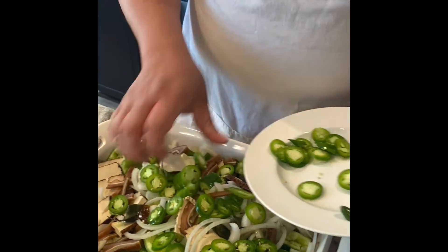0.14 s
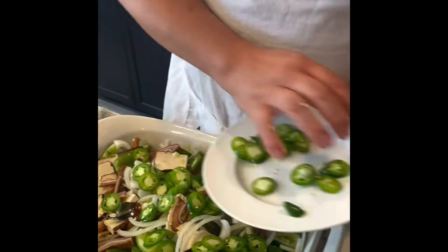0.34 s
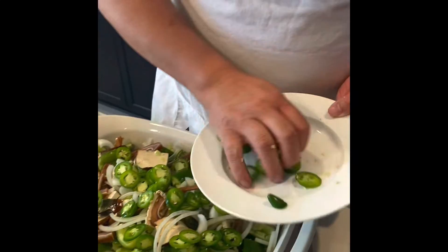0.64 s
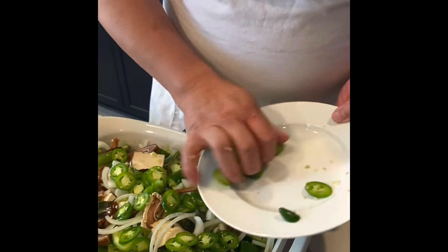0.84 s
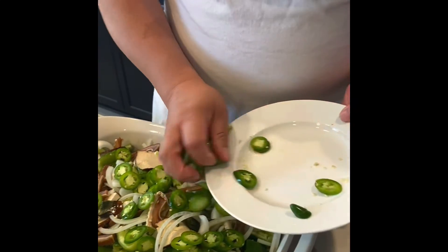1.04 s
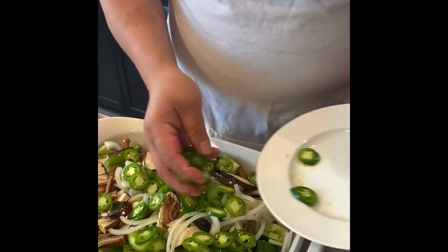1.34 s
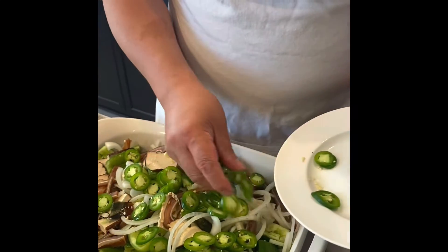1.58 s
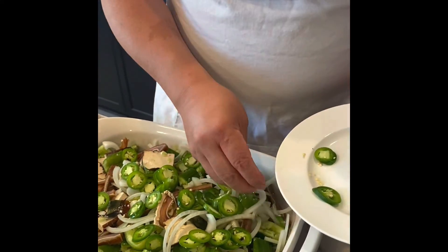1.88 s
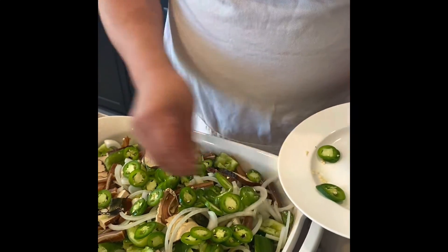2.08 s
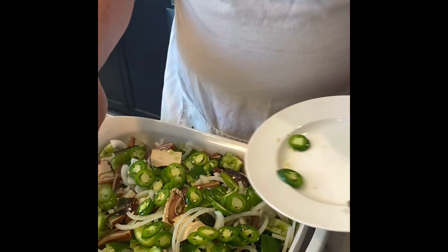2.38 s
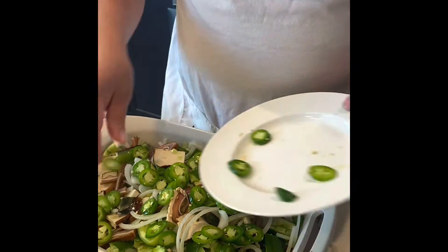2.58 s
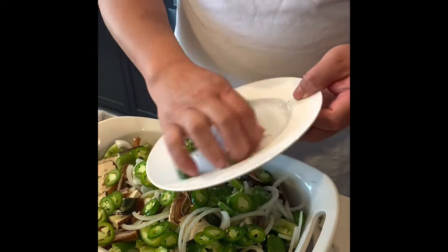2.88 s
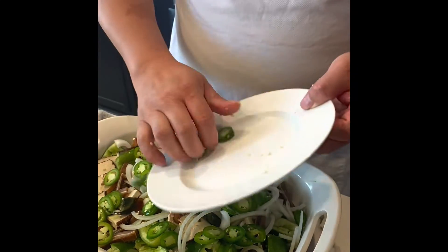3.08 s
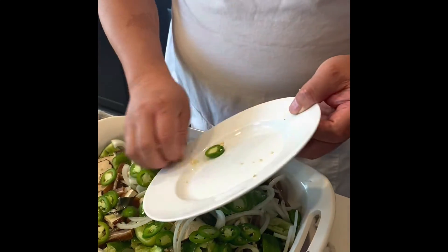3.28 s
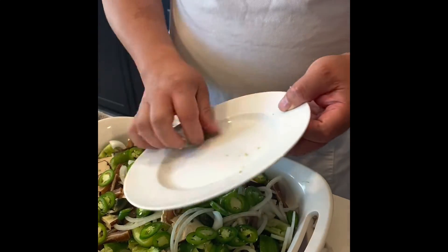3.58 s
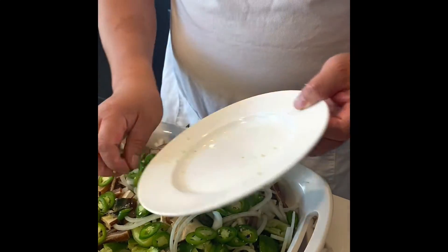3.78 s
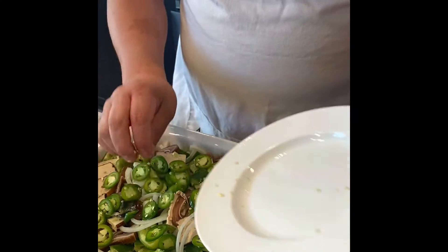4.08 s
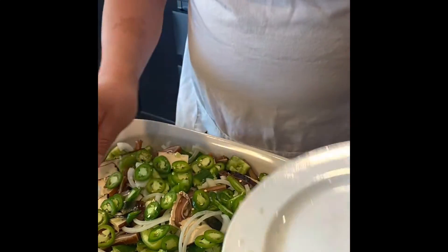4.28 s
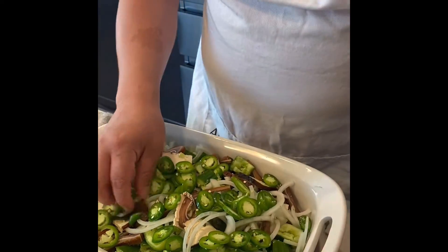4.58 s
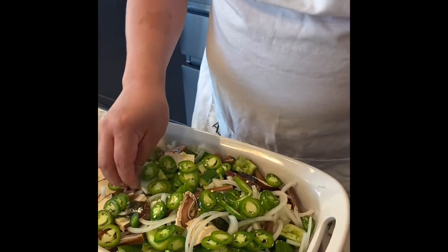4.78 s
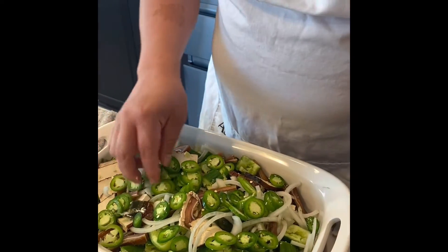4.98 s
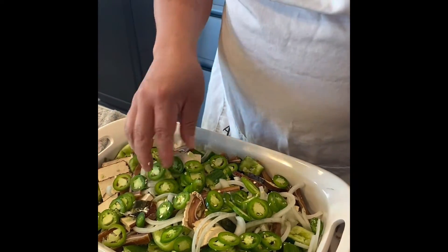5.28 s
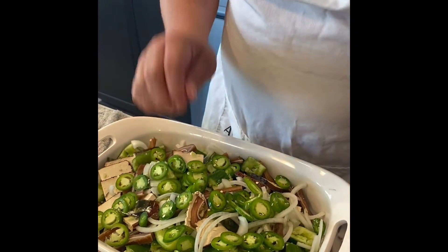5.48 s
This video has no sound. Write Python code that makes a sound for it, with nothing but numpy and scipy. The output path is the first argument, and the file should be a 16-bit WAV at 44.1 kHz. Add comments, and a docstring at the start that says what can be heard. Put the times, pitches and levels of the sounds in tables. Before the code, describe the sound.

A quiet home kitchen, heard very close in stereo, with a soft low appliance rumble throughout. A hand moves over a china plate and a dish of sliced vegetables, giving a continuous faint rustle of skin, sleeve and moist food that swells and fades. From about 0.35 to 1.2 s, small irregular nail ticks touch the plate, clearest near 0.45, 0.65 and 0.95 s, each a short bright ceramic ping damped by the grip. Mostly rustle and faint gliding swishes follow, with a weak tick at 1.85 s. More light ticks cluster at 2.85-3.25 s and 3.6-3.8 s, with brighter brushing. Then only soft rustling until 4.93 s, when the plate is put down: one hard, loud china knock with a dull support and slight low boom. After a brief lull, it rocks from 5.37 to 5.52 s in a rapid uneven clatter, leaving a short, faint room tail.

```python
"""A china plate, held over a dish close to the microphone: nails tick on its glaze as a hand gathers sliced peppers.
Each touch rings the plate's modes under the damping grip. Then the plate is set down on other china: a knock
and a rocking rattle ring the plate, a dull support and a low boom. Skin and food rustle as shaped noise with
faint gliding swishes. Behind the near china lie a short diffuse kitchen tail and a quiet rumble."""
import sys
import numpy as np
from scipy import signal
from scipy.fft import rfft, irfft
from scipy.io import wavfile
from scipy.ndimage import uniform_filter1d

SR = 44100
rng = np.random.default_rng(int(sys.argv[2]) if len(sys.argv) > 2 else 0)


def bounce(signal):
    """Save signal as a 16-bit WAV file at the path given by the first command-line argument."""
    frames = np.transpose(np.atleast_2d(signal))
    limited = np.clip(frames, -1, 1)
    pcm = np.round(limited * 32767).astype(np.int16)
    wavfile.write(sys.argv[1], SR, pcm)


N = 248724   # length in samples
HZ = np.maximum(np.fft.rfftfreq(N, 1 / SR), 1)   # FFT bin frequencies, kept above zero for the logarithms

# the plate's modes: f/Hz, level/dB when tapped on the face, level/dB when struck on the foot
PLATE_MODES = [(1752, -13.5, -15), (1844, -16.5, -10), (1870, -51, -13.5), (2034, -52.5, -7.5),
               (2437, -12, -2), (2510, -10.5, -14.5), (2723, -9, -3), (3170, -37.5, -42),
               (3080, -44, -12.5), (3695, -11.5, -16), (3740, -10.5, 0.5), (3830, -12, -3.5),
               (4284, -9.5, -14.5), (4390, -13, -4), (4700, -11, -14.5), (5450, -12.5, -8), (5590, -5, -7),
               (5750, -5, -3), (6210, -26, -16), (6715, -7, -5.5), (7090, -13, -34), (7500, -16.5, -21),
               (8230, -8, -4), (10380, -18, -27), (10700, -35, -19), (11040, -42, -18), (12030, -47, -18),
               (12720, -54, -22), (12970, -23, -28), (14900, -34, -33), (15330, -45, -39),
               (15690, -44, -21.5)]


def ticks():
    """Nails and slices ring the plate, damped by the holding hand; each touch adds a short snap and a dull pat."""
    # touches on the held plate: t/s, level/dB, two f/Hz the touched spot rings best at,
    # t60/s at 3 kHz under the grip, snap level/dB relative to the touch
    touches = [(.3426, -59.5, 3780, 6750, 0.1, -18), (.441, -39, 2660, 3630, 0.053, 5),
               (0.464, -47, 2734, 5735, 0.017, -25), (0.532, -45, 3740, 3830, 0.04, 10),
               (0.546, -56, 3740, 5735, 0.032, -7), (0.6529, -38.5, 2650, 3695, 0.061, 14.5),
               (0.7554, -62, 3700, 1750, 0.11, -21), (0.952, -66, 5735, 3870, 0.022, 17),
               (0.9601, -43, 2510, 3695, 0.022, 2), (1.098, -59, 4700, 8280, 0.1, -10),
               (1.17, -56.5, 1860, 1860, 0.14, -30), (1.62, -84, 6715, 8230, 0.023, 7),
               (1.849, -52, 1749, 4000, 0.014, -15), (2.842, -51, 3840, 1600, 0.11, 11),
               (2.874, -53.5, 5470, 3780, 0.072, -10), (3.149, -50, 4390, 3695, 0.069, -2),
               (3.165, -51.5, 1752, 6715, 0.054, -5), (3.198, -55, 5735, 4340, 0.039, -7),
               (3.233, -44.5, 2735, 1752, 0.06, -6), (3.578, -52, 5745, 1752, 0.047, 10),
               (3.591, -43, 2450, 3830, 0.033, -18), (3.646, -53.5, 3820, 4500, 0.046, -10),
               (3.683, -55, 6720, 4360, 0.064, 17), (3.719, -59, 6720, 4730, 0.12, -4),
               (3.756, -56.5, 1730, 4600, 0.069, -10), (3.78, -59, 3740, 4510, 0.12, -13),
               (4.871, -55, 1749, 4200, 0.016, -7)]
    face = np.array(PLATE_MODES)[:, [0, 1]]
    plate = np.zeros(N)
    for s, db, one_hz, other_hz, t60, _ in touches:
        add(plate, s, strike(face, db, [one_hz, other_hz], focus_db=3, hard_db=0, t60=t60))
    s, db, *_, snap_db = np.transpose(touches)
    snap = ring(clicks(s, db + snap_db), hz=5900, t60=0.0029)
    pat = ring(clicks(s, db + 1.5), hz=836, t60=0.0095)
    return plate + snap + pat


def knocks():
    """The plate rings while its support answers with a short knock; a harder contact makes both brighter."""
    # plate on china: t/s, knock level/dB, hardness/(dB per octave), plate ring level/dB,
    # two f/Hz the ring is strongest at
    contacts = [(4.9286, -27, 4, -48.5, 3740, 2730), (4.937, -3, 6, -28, 3740, 5450),
                (4.946, -47, -5, -26.5, 3750, 4400), (4.962, -13, -25, -51, 3670, 1730),
                (5.285, -41, -16.5, -84.5, 2750, 1750), (5.306, -32, -15, -98, 2760, 1730),
                (5.366, -34, -17, -73, 1750, 4360), (5.371, -25.5, -12, -57.5, 4390, 1730),
                (5.3751, -15.5, -11, -44, 4390, 5470), (5.382, -26, -16, -64, 4390, 1750),
                (5.407, -30, -3, -49, 4390, 2730), (5.413, -7.5, 0, -37, 3830, 4390),
                (5.419, -18, -1.5, -33.5, 2730, 3830), (5.454, -6, 1.5, -33, 2730, 3830),
                (5.464, -4.5, -6, -35, 2730, 5470), (5.477, -3, -7, -20.5, 2820, 5500),
                (5.484, -14.5, 3, -34, 2730, 1752), (5.493, -18, -15.5, -22.5, 3740, 5570),
                (5.503, -8, -9, -22.5, 3740, 1752), (5.511, -11.5, 1.5, -36, 2730, 3830),
                (5.518, -25, -9, -44.5, 2730, 5450)]
    # the support under the plate, short and dull: f/Hz, level/dB, t60/s
    support_modes = [(948, -9.5, 0.053), (1021, -5.5, 0.015), (1046, -0.5, 0.017), (1197, -5, 0.016),
                     (1460, -6, 0.0098), (1880, -15.5, 0.023), (2300, -6.5, 0.0029), (3010, -8, 0.0017)]
    # low boom of the counter: f/Hz, level/dB, t60/s
    boom_modes = [(118.8, -39, 0.42), (251, -31.5, 0.11), (362, -27.5, 0.027), (542, -19, 0.026)]
    foot = np.array(PLATE_MODES)[:, [0, 2]]
    plate = np.zeros(N)
    for s, _, hard_db, db, *hz in contacts:
        add(plate, s, strike(foot, db, hz, focus_db=3, hard_db=hard_db, t60=0.042))
    s, knock_db, hard_db = np.transpose(contacts)[:3]
    knock = np.zeros(N)
    for k, (hz, db, t60) in enumerate(support_modes):
        level_db = knock_db + db + hard_db * np.log2(hz / 1000)
        knock += (-1) ** k * ring(clicks(s, level_db), hz, t60)
    knock = signal.sosfilt(signal.butter(4, 740, "high", fs=SR, output="sos"), knock)   # too small to radiate bass
    boom = sum(ring(clicks(s, knock_db + db), hz, t60) for hz, db, t60 in boom_modes)
    return plate + soft(knock, contact_hz=4500) + soft(boom, contact_hz=670)


def strike(modes, db, spots_hz, focus_db, hard_db, t60):
    """One touch drives every mode, less so the more octaves it lies from the spot's best pitches."""
    contact_s = 0.0003   # the ring builds up while the contact lasts
    favoured_db, favoured_longer = 6.5, 2.2   # the least held modes: louder, and t60 times this
    hz, mode_db = modes.T[..., None]
    octaves = abs(np.log2(hz / spots_hz))
    away = np.minimum(octaves.min(axis=1, keepdims=True), .7)
    favoured = (octaves == octaves.min(axis=0)).any(axis=1, keepdims=True)   # nearest to each best pitch
    level_db = db + mode_db - focus_db * away + favoured_db * favoured
    level_db = level_db + hard_db * np.log2(hz / 3000)
    level_db = level_db + 2 * rng.standard_normal(hz.shape)   # no two touches alike
    t = np.arange(SR // 5) / SR
    mode_t60 = t60 * favoured_longer ** favoured / (hz / 3000) ** 0.29   # high modes die sooner
    rings = amp(level_db) * amp(-60 * t / mode_t60) * np.sin(2 * np.pi * hz * t)
    mixed = rings[::2].sum(axis=0) - rings[1::2].sum(axis=0)   # signs alternate
    fade_out = 40 * (t[-1] - t)   # over the last 25 ms
    return mixed * np.minimum(1, np.minimum(t / contact_s, fade_out))


def ring(clicks, hz, t60):
    """A two-pole resonator: a unit click sets a dying sine of starting height 1 ringing."""
    r, w = amp(-60 / (t60 * SR)), 2 * np.pi * hz / SR
    return signal.lfilter([0, np.sin(w)], [1, -2 * r * np.cos(w), r * r], clicks + 1e-18)


def clicks(times, db):
    """One sample for each touch."""
    out = np.zeros(N)
    np.add.at(out, np.round(np.asarray(times) * SR).astype(int), amp(db))
    return out


def soft(x, contact_hz):
    """A contact that lasts a while loses its treble."""
    return signal.sosfilt(signal.butter(2, contact_hz, fs=SR, output="sos"), x)


def add(out, s, sound):
    """Mixes a short sound into out from time s."""
    part = out[round(s * SR):][:len(sound)]
    part += sound[:len(part)]


def rustle():
    """Friction noise; its treble sheen comes and goes, and the plate sings along faintly."""
    # hand and sleeve moving: t/s, level/dB of the rustle
    moving = [(0.0, -63.5), (0.22, -69), (0.47, -59), (0.6, -63.5), (0.68, -56.5), (0.9, -60.5), (1.3, -62),
              (1.5, -66.5), (1.69, -72.5), (1.93, -59.5), (2.2, -59), (2.38, -63.5), (2.65, -62),
              (2.85, -58), (3.05, -60.5), (3.22, -59), (3.5, -63.5), (3.9, -64), (4.14, -58.5), (4.37, -65),
              (4.58, -59), (4.78, -61.5), (4.9, -56.5), (5.35, -62.5), (5.64, -54)]
    # colour of the rustle: f/Hz, level/dB per Hz (relative)
    body_colour = [(500, 4.5), (1200, -4.5), (2500, -9), (4000, -9.5), (6000, -17), (7200, -20.5),
                   (9000, -60)]
    # colour of the sheen: f/Hz, level/dB per Hz (relative)
    sheen_colour = [(5000, 1.5), (7500, -1), (9000, -3.5), (11000, -6.5), (13000, -16), (15500, -2)]
    # stretches of brighter treble hiss: from t/s, to t/s, level/dB
    bright_stretches = [(0.0, 0.108, -74), (0.38, 0.546, -67), (0.662, 0.752, -73.5), (0.856, 1.302, -69.5),
                        (1.486, 1.58, -75), (1.827, 1.885, -70.5), (1.998, 2.173, -73.5),
                        (2.294, 2.344, -73), (2.745, 3.023, -69.5), (3.14, 3.33, -70.5),
                        (3.58, 3.737, -64.5), (4.524, 4.68, -68), (4.84, 4.916, -71), (5.303, 5.64, -76.5)]
    rest_db, fade_db_per_s = -89, 200   # hiss between the stretches; how fast the hiss swells and fades
    t = np.arange(N) / SR
    sings = sum(amp(db) / np.sqrt(1 + (2 * (HZ - hz) / 40) ** 2) for hz, db, _ in PLATE_MODES)   # 40 Hz wide
    body = steady(amp(at_hz(body_colour, HZ)) * (1 + 1.73 * sings))
    sheen = steady(amp(at_hz(sheen_colour, HZ)) * (HZ > 4000))
    sheen_db = np.full(N, float(rest_db))
    for start, end, db in bright_stretches:
        outside_s = np.maximum(0, np.maximum(start - t, t - end))
        sheen_db = np.maximum(sheen_db, db - fade_db_per_s * outside_s)
    body_gain = amp(np.interp(t, *np.transpose(moving)))
    return body_gain * patchy(body, patchy_db=2.2) + amp(sheen_db) * patchy(sheen, patchy_db=5.5)


def patchy(x, patchy_db):
    """Every half octave from 400 Hz up swells and sinks on its own, smoothed over some 57 ms."""
    edges, spectrum, out = 400 * 2 ** np.arange(0, 6, .5), rfft(x), 0
    for low, high in zip(edges, edges[1:]):
        slow = uniform_filter1d(rng.standard_normal(N // 100 + 2), size=25)   # one value per 100 samples
        swell = np.interp(np.arange(N) / 100, np.arange(len(slow)), slow / slow.std())
        band = spectrum * ((HZ >= low) & (HZ < high))
        if abs(band).max() > 1e-6:   # empty bands are skipped
            out = out + amp(patchy_db * swell) * irfft(band, N)
    return out


def swishes():
    """Narrow noise: a gliding tone scrambled by slow noise of its own in each channel."""
    # faint swishes that glide in pitch: from t/s, to t/s, from f/Hz, to f/Hz, level/dB
    glides = [(0.203, 0.384, 4700, 5900, -79), (0.227, 0.417, 2550, 2900, -68),
              (1.148, 1.401, 4070, 4470, -71), (2.249, 2.958, 2120, 4220, -77),
              (3.896, 4.265, 5960, 5840, -72), (4.247, 4.554, 5000, 6000, -74.5),
              (5.152, 5.382, 4800, 6470, -74)]
    out = np.zeros((2, N))
    for start, end, from_hz, to_hz, db in glides:
        at = np.arange(int(start * SR), int(end * SR))
        phase = 2 * np.pi * np.cumsum(np.linspace(from_hz, to_hz, len(at))) / SR
        slow = uniform_filter1d(rng.standard_normal((2, SR)), size=600)[:, :len(at)]
        swell = np.hanning(len(at)) ** .5
        out[:, at] += amp(db) * swell * slow / slow.std() * np.sin(phase)
    return out


def kitchen(x, onset_s):
    """Diffuse tail: octave bands of noise, each dying at its own rate."""
    # decay of the kitchen: f/Hz, t60/s
    room_t60 = [(200, 0.66), (500, 0.39), (1000, 0.41), (2500, 0.33), (6000, 0.45), (12000, 0.14)]
    t, tail = np.arange(SR // 2) / SR, np.zeros((2, N))
    for low in 125 * 2 ** np.arange(7):
        band = signal.butter(2, [low, 2 * low], "band", fs=SR, output="sos")
        fade = amp(-60 * t / at_hz(room_t60, np.sqrt(2) * low)) * (1 - np.exp(-t / onset_s))
        tail[:, :len(t)] += signal.sosfilt(band, rng.standard_normal((2, len(t)))) * fade
    margin = SR // 10   # room ahead of the tail for the filter in diffuse()
    tail = diffuse(np.ones(len(HZ)), np.roll(tail, margin, axis=1))
    return signal.fftconvolve(x[None], tail[:, :SR])[:, margin:N + margin]


def rumble():
    """House and appliance noise, lifted at the standing waves."""
    # colour of the rumble: f/Hz, level/dB per Hz (relative)
    rumble_colour = [(15, -76), (25, -16), (82, -6), (124, -12), (229, -14), (332, -14), (375, -20.5),
                     (404, -19.5), (889, -28.5), (1320, -24), (1690, -46.5), (1950, -39), (9000, -84),
                     (11700, -113), (19800, -120)]
    # standing waves: f/Hz, width/Hz, lift level/dB
    standing_waves = [(78.2, 5.6, 2), (122.9, 8, 13.5)]
    lift = sum(amp(db) / np.sqrt(1 + (2 * (HZ - hz) / width) ** 2) for hz, width, db in standing_waves)
    return amp(-52) * steady(amp(at_hz(rumble_colour, HZ)) * (1 + lift))


def steady(gain):
    """Diffuse noise of rms 1, coloured by gain per FFT bin."""
    x = diffuse(gain, rng.standard_normal((2, N)))
    return x / x.std()


def diffuse(gain, white):
    """Stereo from two noises, coloured by gain per FFT bin, with a width that depends on frequency."""
    # stereo width of the noise and tail, lows nearly the same, high treble opposite left and right:
    # f/Hz, correlation (1 = same, -1 = opposite; clipped to that range)
    stereo_width = [(60, 0.97), (92, 1), (140, 0.94), (210, 0.85), (330, 0.6), (500, -0.055), (770, -0.65),
                    (1170, -0.16), (1790, 0.28), (2740, 0.057), (4190, -0.11), (6410, -0.44),
                    (9810, -1.323), (15000, -0.33)]
    alike = np.clip(at_hz(stereo_width, HZ), -1, 1)
    mid, side = rfft(white) * gain
    return irfft(np.sqrt(1 + alike) * mid + np.sqrt(1 - alike) * side * [[1], [-1]], N)


def ports(x, tilt):
    """Two microphone ports hear a near source with their own level and phase."""
    # phase between the ports: f/Hz, lead of the left port/rad
    lead = [(0, 0), (240, -.6), (530, -2.3), (900, -2.6), (1400, -2.4), (1900, -.4), (2450, 1.1),
            (5600, 1.5), (8000, 2.9), (11000, 3.15), (13000, 3.8), (15400, 6)]
    half = amp(at_hz(tilt, HZ) / 2) * np.exp(.5j * np.interp(HZ, *np.transpose(lead)))   # half to each port
    return irfft(rfft(x) * np.array([half, 1 / half]), N)


def amp(db):
    """Decibels to gain."""
    return 10 ** (np.asarray(db) / 20)


def at_hz(points, hz):
    """A spectrum table read on a log-frequency axis."""
    table = np.array(points)
    return np.interp(np.log(hz), np.log(table[:, 0]), table[:, 1])


def scene():
    """China near the microphone, in the kitchen's tail and noise."""
    # plate in the hand: f/Hz, left minus right level/dB
    held_tilt = [(300, 0), (900, -7), (1750, -4), (2600, -5.5), (3750, -2.5), (4500, -4), (5500, 1),
                 (14000, 1)]
    # plate being set down: f/Hz, left minus right level/dB
    set_down_tilt = [(240, 0), (530, 2), (900, -5), (1100, -9), (1400, -4), (2100, 6), (2700, 2),
                     (3750, -1), (5500, 0), (8000, 0), (14000, 0)]
    held, set_down = ticks(), knocks()
    near = ports(held, held_tilt) + ports(set_down, set_down_tilt)
    tail = amp(-39.5) * kitchen(amp(-6.5) * held + set_down, onset_s=0.00067)
    return near + tail + rustle() + swishes() + rumble()


def record(dry):
    """The right port is a little more sensitive; subsonics and the top above some 16 kHz are cut."""
    dry = signal.sosfilt(signal.butter(2, 28, "high", fs=SR, output="sos"), dry * amp([[-.4], [.4]]))
    return signal.sosfilt(signal.cheby2(12, 60, 16500, fs=SR, output="sos"), dry)


dry = scene()
out = record(dry)
bounce(out)
```